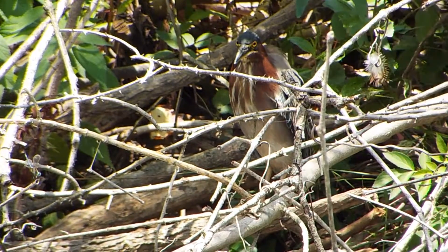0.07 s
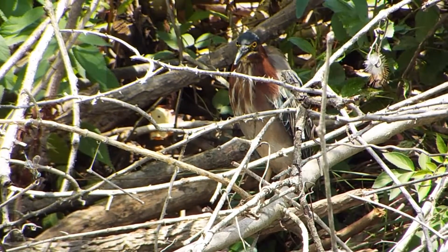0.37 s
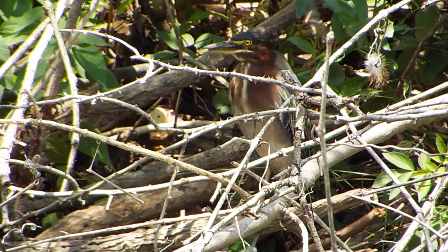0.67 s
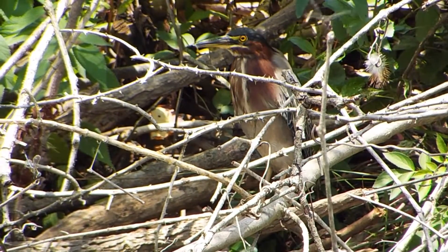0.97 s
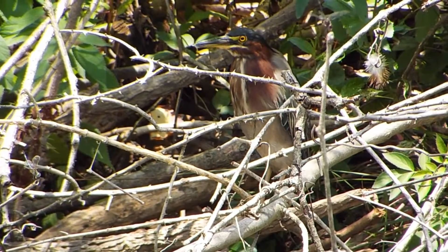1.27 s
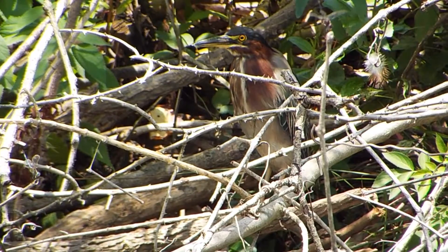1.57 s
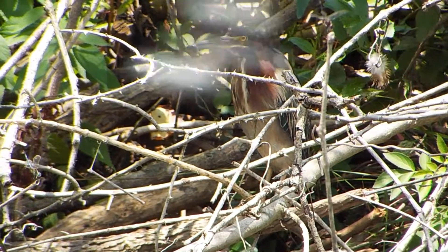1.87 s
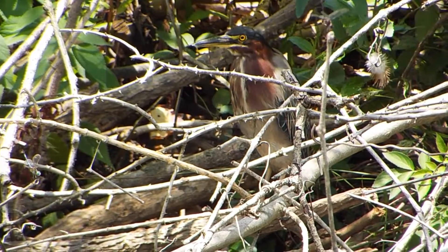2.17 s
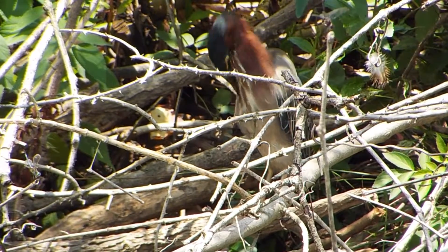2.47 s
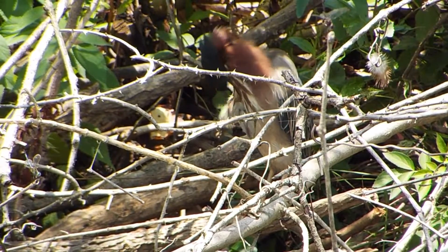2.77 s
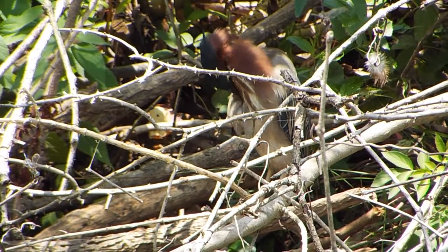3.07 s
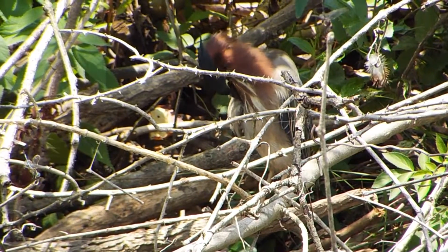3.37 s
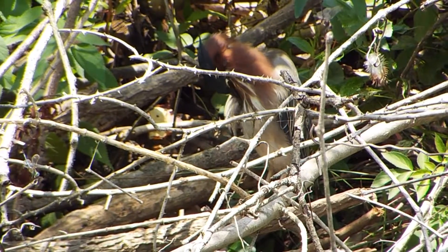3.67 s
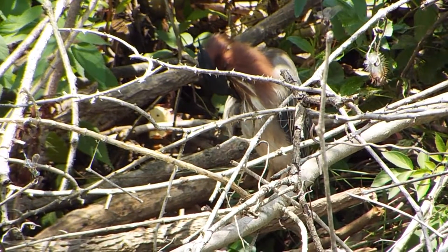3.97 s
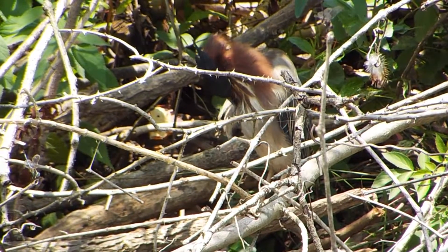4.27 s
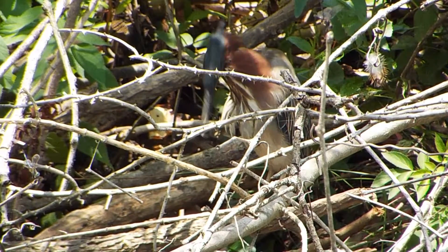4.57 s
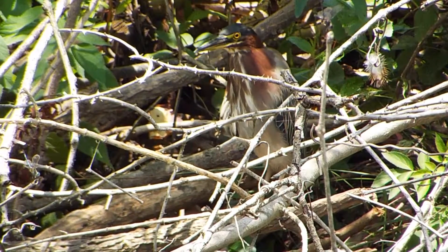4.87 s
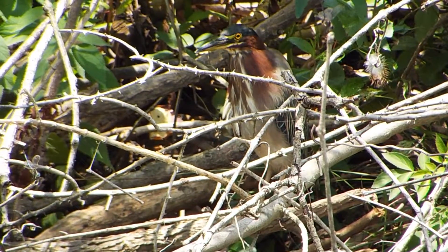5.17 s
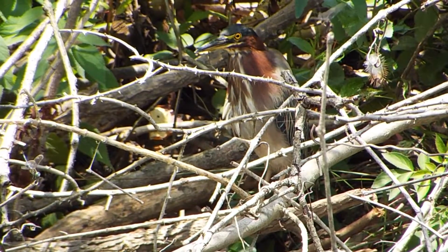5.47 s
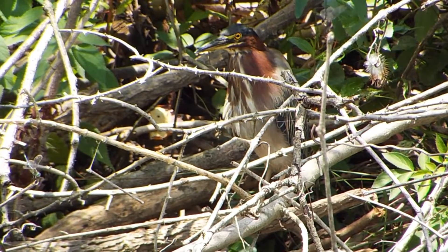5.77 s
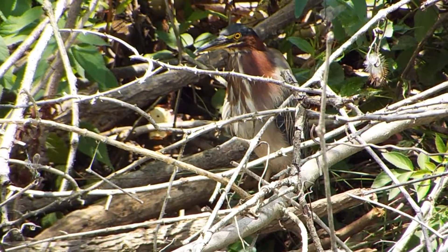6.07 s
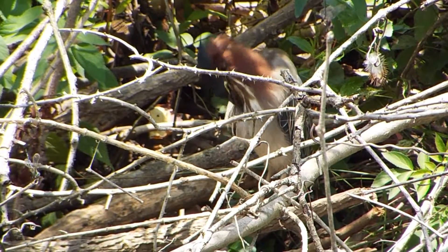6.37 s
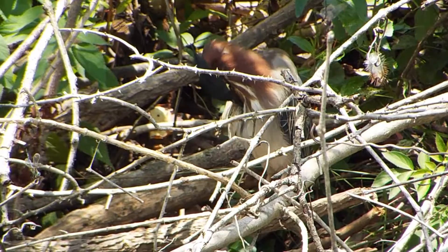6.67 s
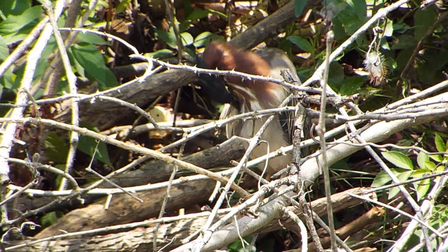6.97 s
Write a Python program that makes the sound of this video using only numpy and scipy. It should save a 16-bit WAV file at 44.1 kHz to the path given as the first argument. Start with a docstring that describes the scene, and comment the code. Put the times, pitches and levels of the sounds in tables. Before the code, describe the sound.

Outdoors in wetland brush, the microphone picks up a constant low rumble of far traffic and an engine's hum beneath a high, even buzz of cicadas. Just after the start something nearby creaks once, very briefly. A small bird then gives several thin, short chips. The cicadas grow slightly louder, while faint cricket trills and katydid ticks and buzzes come and go. Everything sits a little to the left.

```python
"""A summer wetland: a chorus of cicadas swells, the nearest buzzing with its clicking tymbals.
Crickets trill and chirp and katydids lisp, tick and buzz, all by scraping their wings.
A small bird whistles a few falling chips, and something close by slips and creaks once.
Behind them a distant engine drones, machines hum, a far vehicle passes and traffic rumbles."""
import sys
import numpy as np
from scipy.fft import rfft, irfft, next_fast_len
from scipy.io import wavfile
from scipy.ndimage import map_coordinates

SR = 44100
rng = np.random.default_rng(int(sys.argv[2]) if len(sys.argv) > 2 else 0)


def log_audio(samples):
    """Write samples as a 16-bit WAV file to the path given in sys.argv[1]."""
    # one column per channel
    frames = np.atleast_2d(samples).T
    # limit to full scale, then quantise
    limited = np.clip(frames, -1, 1)
    pcm = np.round(limited * 32767).astype(np.int16)
    wavfile.write(sys.argv[1], SR, pcm)


N = 310023
T = np.arange(N) / SR


def amp(db):
    """Decibels to gain."""
    return 10 ** (np.asarray(db) / 20)


def unit(x):
    """Scale to rms 1."""
    return x / np.sqrt(np.mean(x ** 2) + 1e-20)


def along(points, hz):
    """(Hz, value) points read on a log axis."""
    knot_hz, values = np.transpose(points)
    return np.interp(np.log(hz + 1), np.log(knot_hz + 1), values)


def curves(rows):
    """One value per sample for each column after the time."""
    times_s, *columns = np.transpose(rows)
    return [np.interp(T, times_s, column) for column in columns]


def wobble(rate_hz):
    """Smooth random curve, rate_hz knots a second."""
    return map_coordinates(rng.standard_normal(int(N * rate_hz / SR) + 4), [T * rate_hz])


def cycles(hz):
    """Running phase in radians, from a random start."""
    return 2 * np.pi * (np.cumsum(hz * np.ones(N)) / SR + rng.random())


def filtered(x, response):
    """Apply a frequency response to x."""
    size = next_fast_len(N + SR // 4)
    return irfft(rfft(x, size) * response(np.fft.rfftfreq(size, 1 / SR)), size)[..., :N]


def colour(points):
    """Response of a (Hz, dB) spectrum."""
    return lambda f: amp(along(points, f))


def body(modes):
    """Causal response of resonances, alternating in sign."""
    return lambda f: sum((-1) ** k * amp(db) * 1j * f * width_hz / (hz * hz - f * f + 1j * f * width_hz)
                         for k, (hz, width_hz, db) in enumerate(modes))


def band(centre_hz, sigma_hz):
    """Bell-shaped response."""
    return lambda f: np.exp(-.5 * ((f - centre_hz) / sigma_hz) ** 2)


def noise(response, gate=1):
    """Stereo noise, gated, then coloured; its mid signal has rms 1."""
    # Each row: frequency in Hz, left-right likeness (capped at 1 below).
    likeness = [(30, 1.2), (70, 0.7), (130, 1.1), (300, 0.8), (1000, 0.7), (5000, .79), (8000, 0.5),
                (13000, 0.1)]

    def mid_side_response(f):
        alike = np.clip(along(likeness, f), 0, 1)
        return response(f) * np.sqrt([1 + alike, 1 - alike])

    mid, side = filtered(rng.standard_normal((2, N)) * gate, mid_side_response)
    return np.array([mid + side, mid - side]) / np.std(mid)


def strokes(rate_hz, drift, sharp):
    """Gate of rms 1 that opens once per wing or tymbal stroke."""
    phase = cycles(rate_hz * (1 + drift * wobble(5)))
    return unit(np.exp(sharp * np.cos(phase)))


def syllables(runs, gap_s, length_s, scatter_db=1.5):
    """Round-shouldered swells, about gap_s apart through each run."""
    gate = np.zeros(N)
    for first_s, last_s in runs:
        for s in np.linspace(first_s, last_s, round(abs(last_s - first_s) / gap_s) + 1):
            span = slice(max(int((s - length_s) * SR), 0), int((s + length_s) * SR))
            shape = np.exp(-(2 * (T[span] - s) / length_s) ** 4)
            gate[span] += amp(scatter_db * rng.standard_normal()) * shape
    return gate


def wing_tone(hz, stray):
    """Tone of rms 1 whose pitch strays quickly by a small fraction."""
    return np.sqrt(2) * np.sin(cycles(hz * (1 + stray * wobble(160))))


def cicadas():
    """Far singers blur into a hiss with faint pitches; the nearest swells with them, tymbals ringing."""
    # Each row: time in seconds, chorus effort in dB.
    effort = [(0.0, -58.5), (0.45, -59.5), (0.9, -58.5), (1.55, -56.5), (3.35, -54), (3.86, -55),
              (5.7, -55), (6.52, -54), (7.03, -54)]
    # Each row: frequency in Hz, relative density in dB.
    chorus_spectrum = [(2800, -37), (3300, -9), (3900, -5), (4050, -9), (4250, -1), (4500, -4),
                       (5100, -1.5), (5450, -2), (6300, -1), (7000, -2.5), (7300, -8), (7700, -4),
                       (8150, -5.5), (8700, -19), (10000, -60)]
    # Each row: a far singer's pitch in Hz, level in dB re the effort.
    far_singers = [(3360, -20.5), (4230, -20), (4660, -18.5), (5060, -17), (5660, -15.5), (6160, -17),
                   (6340, -15)]
    # Each row: tymbal resonance in Hz, width in Hz, gain in dB.
    tymbal_modes = [(4330, 110, -9), (4940, 53, 10), (5230, 220, -6), (5730, 270, -6), (6100, 71, -1),
                    (6400, 240, 4)]
    effort_db, = curves(effort)
    hiss = amp(-1.7 + 0.3 * wobble(11)) * noise(colour(chorus_spectrum))
    drones = sum(amp(db + 1.7 * wobble(3.02)) * noise(band(hz, 35)) for hz, db in far_singers)
    clicks = strokes(rate_hz=377.7, drift=.001, sharp=2.2)
    ring = filtered(noise(body(tymbal_modes), clicks), band(4700, 1700))
    snap = noise(band(5560, 980), clicks)
    near_db = -67 + 2.8 * (effort_db - effort_db.mean())  # 2.8 dB per dB of effort
    nearest = amp(near_db + wobble(9.5)) * (amp(-2) * ring + amp(-1) * snap)
    return amp(effort_db) * (hiss + drones) + nearest


def crickets():
    """One trills in two swells, its pitch sagging within each wing stroke; one chirps high, then stops."""
    # Each row: crest time in seconds, rise in dB/s, crest level in dB.
    trill_swells = [(1.9, 5, -65.5), (6.6, 1, -67.5)]
    # Each row: first and last chirp in seconds.
    chirp_runs = [(0.01, 2.495)]
    rest_db, fall_db_per_s = -72, 2.5
    swells_db = [db - np.maximum(rise * (s - T), fall_db_per_s * (T - s)) for s, rise, db in trill_swells]
    trill_db = np.maximum(rest_db, np.max(swells_db, axis=0))
    wing_phase = cycles(50 + .08 * wobble(5))
    rattle = unit(np.exp(1.05 * np.cos(wing_phase))) * amp(.7 * wobble(22))
    voice = wing_tone(3620 - 65 * np.sin(wing_phase), stray=0.00582) + amp(-8) * noise(band(3680, 90))
    trill = amp(trill_db + 0.71 * wobble(2.9)) * rattle * voice
    chirps = syllables(chirp_runs, gap_s=.138, length_s=0.038) * wing_tone(8195, stray=0.0033)
    return trill + amp(-65) * chirps


def katydids():
    """One lisps in short trains of wing strokes; a meadow katydid ticks and buzzes."""
    # Each row: first and last syllable in seconds.
    lisp_runs = [(.08, .96), (1.21, 1.87), (2.17, 2.81), (3.08, 4.83), (5.09, 6.66), (6.93, 6.93)]
    tick_runs = [(4.848, 5.082), (6.863, 6.982)]
    # Each row: start and end in seconds, relative level at each in dB.
    buzz_spans = [(-0.1, 0.69, -69, -67.5), (2.5, 3.25, -74, -74), (5.116, 5.851, -70.5, -65.5)]
    # Each row: frequency in Hz, relative density of the wings' ring in dB.
    wing_spectrum = [(7000, -40), (9000, -5), (9900, -5), (10900, -4), (11400, -4), (11850, 0), (12250, -9),
                     (13000, -8), (14500, -16), (15700, -13)]
    lisp_gate = syllables(lisp_runs, gap_s=.22, length_s=0.061)
    lisps = lisp_gate * strokes(rate_hz=147, drift=0.038, sharp=0.63) * noise(band(10470, 420))
    ticks = syllables(tick_runs, gap_s=.059, length_s=0.0073) * noise(band(11900, 1202))
    buzz_gate = sum(amp(np.interp(T, [start_s, end_s], [first_db, last_db])) * (T > start_s) * (T < end_s)
                    for start_s, end_s, first_db, last_db in buzz_spans)
    buzzes = buzz_gate * strokes(rate_hz=60, drift=0.0031, sharp=0.59) * noise(colour(wing_spectrum))
    return amp(-71) * lisps + amp(-63.5) * ticks + amp(-1.5) * buzzes


def bird(end_hz=4770):
    """Each chip is a brief whistle that falls ever faster to the same pitch."""
    # Each row: start in seconds, length in seconds, start pitch in Hz, relative level in dB.
    chips = [(2.004, .024, 5600, -57), (2.544, .019, 6250, -48), (2.646, 0.016, 5400, -49),
             (2.791, .014, 5470, -51), (2.846, .012, 5300, -51), (2.882, .019, 6000, -45),
             (3.136, .0153, 5650, -48.5), (3.195, 0.0086, 5040, -48), (3.232, .028, 5700, -48)]
    song = np.zeros(N)
    for start_s, length_s, start_hz, db in chips:
        progress = np.linspace(0, 1, int(length_s * SR))
        hz = start_hz + (end_hz - start_hz) * progress ** 1.79
        envelope = amp(db) * np.sqrt(2 * abs(np.sin(np.pi * progress)))
        song[int(start_s * SR):][:len(hz)] += envelope * np.sin(2 * np.pi * np.cumsum(hz) / SR)
    return amp(-1.5) * song


def creak(start_s=.246, count=6, gap_s=.0042, scatter_s=.0005):
    """Quick, gritty slips, uneven and strongest midway, ring a small stiff body."""
    # Each row: resonance in Hz, width in Hz, gain in dB.
    body_modes = [(483, 45, 4), (1070, 310, -9), (1640, 120, 1.5), (1980, 180, -6), (2680, 120, -8),
                  (3650, 200, -11)]
    slips, t = np.zeros(N), np.arange(SR // 100) / SR
    for k in range(count):
        slip_s = start_s + k * gap_s + scatter_s * rng.standard_normal()
        push = 0.13 * rng.standard_normal(len(t)) * amp(-60 * t / 0.01)  # grit: down 60 dB in 10 ms
        push[0] = 1
        push_db = -8.5 - 2 * abs(k - (count - 1) / 2)
        slips[int(slip_s * SR):][:len(t)] += amp(push_db) * push
    return filtered(slips, body(body_modes))


def engine(cylinders=6):
    """Only low orders carry this far; moving air makes each one waver."""
    # Each row: time in seconds, firing rate in Hz, relative level in dB.
    running = [(0.0, 151, -49.5), (0.08, 150.5, -47), (1.02, 149.8, -50), (1.53, 153.1, -47),
               (2.51, 148.9, -51.5), (3.11, 151.4, -45), (3.62, 151.0, -50.5), (3.99, 151.6, -46.5),
               (4.44, 151, -47.5), (5.64, 158, -49), (6.13, 158, -55.5), (6.32, 154.4, -49),
               (6.99, 149.5, -51), (7.03, 147.6, -47)]
    # Each row: multiple of the cycle rate, relative level in dB.
    orders = [(2, -10), (3, -17), (5, -6.5), (6, 0), (7, -15), (8, -26)]
    firing_hz, level_db = curves(running)
    cycle_phase = cycles(firing_hz / cylinders)
    drone = np.zeros(N)
    for order, order_db in orders:
        gain = amp(level_db + order_db + 1.08 * wobble(4.236))
        drone += gain * np.sin(order * cycle_phase + 0.14 * wobble(3.7) + rng.uniform(0, 2 * np.pi))
    return np.sqrt(2) * amp(-0.1) * drone


def machines():
    """Far machines hum, each wavering in level and pitch."""
    # Each row: pitch in Hz, level in dB.
    hums = [(32.8, -54.5), (71, -57.5), (503, -80.5), (589, -78)]
    return np.sqrt(2) * sum(amp(db + 2.9 * wobble(2.98)) * np.sin(cycles(hz * (1 + 0.00575 * wobble(4))))
                            for hz, db in hums)


def vehicle(pass_s=4.8, pass_hz=267, climb_hz_per_s=12, hold_s=1.1, fade_db_per_s=10.5):
    """Two engine orders climb as a far vehicle gathers speed; it nears, holds its level and fades."""
    phase = cycles(pass_hz + climb_hz_per_s * (T - pass_s) + 3 * wobble(14))
    tones = np.sin(phase) + amp(-5) * np.sin(phase * 4 / 3)
    level_db = -65.5 - fade_db_per_s * np.maximum(abs(T - pass_s) - hold_s / 2, 0)
    return np.sqrt(2) * amp(level_db + 2.5 * wobble(9.7)) * tones


def traffic():
    """A steady low rumble, and the even wash of roads and air above it."""
    # Each row: frequency in Hz, relative density in dB.
    rumble_spectrum = [(5, -13), (17, -8), (45, -0.5), (70, 2.5), (95, -2), (140, -4), (175, -8.5),
                       (230, -13), (300, -20.5), (450, -32.5), (900, -76)]
    wash_spectrum = [(100, -28), (250, 2.5), (450, 0.5), (650, -1), (950, -0.5), (1250, -4.5), (1800, -6.5),
                     (2700, -10.5), (5000, -9), (9000, -16), (11500, -19), (13500, -19.5), (15700, -24)]
    rumble = amp(-48.5 + 0.51 * wobble(2.68)) * noise(colour(rumble_spectrum))
    wash = amp(-58 + 0.3 * wobble(4.37)) * noise(colour(wash_spectrum))
    return rumble + wash


def scene():
    """All sources together; the left side is louder, most of all in the bass."""
    # Each row: frequency in Hz, left minus right in dB.
    lean = [(130, 7.1), (350, 6.3), (1400, 5), (2800, 4.8), (5600, 3.9), (10000, 2.3), (14000, 1.3)]

    def balance(f):
        lean_db = along(lean, f)
        sides = amp([lean_db / 2, -lean_db / 2])
        return sides / sides.mean(axis=0)

    mix = traffic() + cicadas() + crickets() + katydids()
    mix += engine() + machines() + vehicle() + bird() + creak()
    return filtered(mix, balance)


def record(dry):
    """Brick-wall low-pass at 15.7 kHz."""
    return filtered(dry, lambda hz: hz < 15700)


dry = scene()
out = record(dry)
log_audio(out)
```